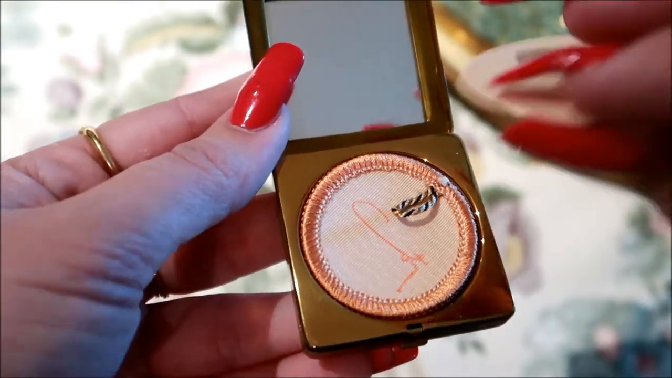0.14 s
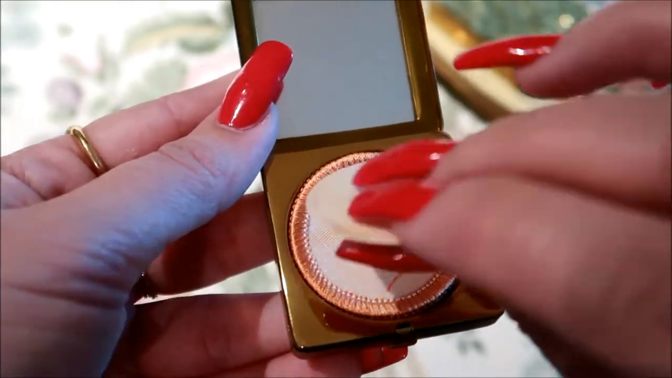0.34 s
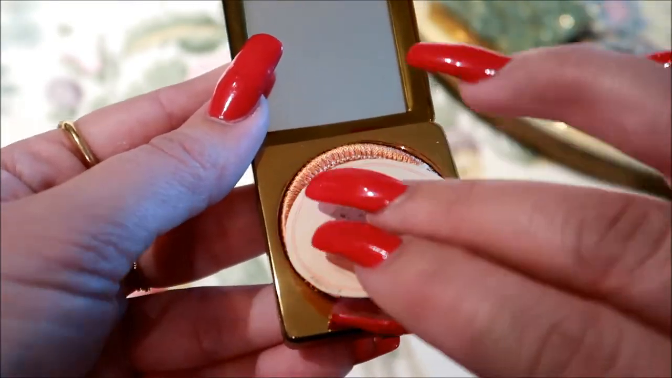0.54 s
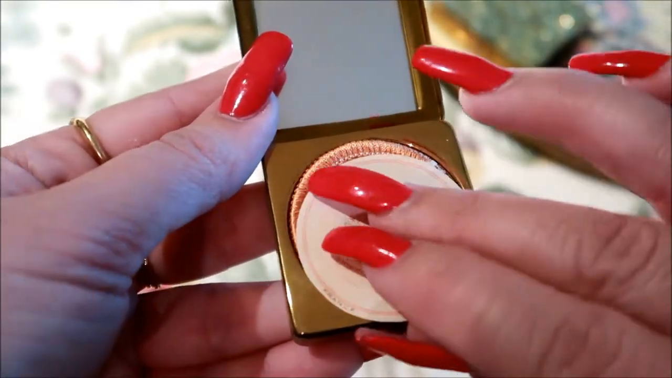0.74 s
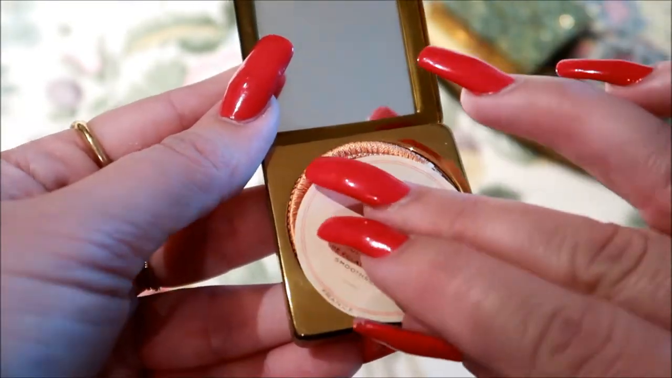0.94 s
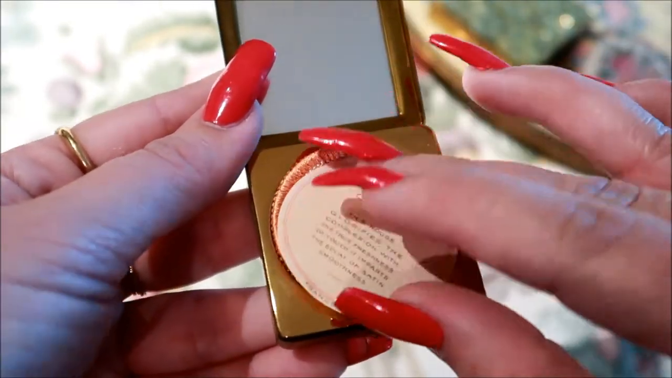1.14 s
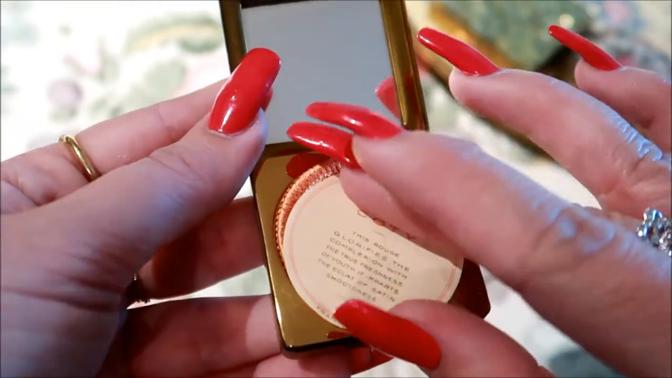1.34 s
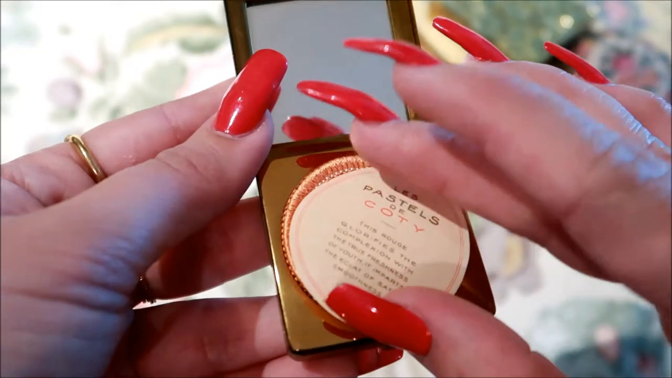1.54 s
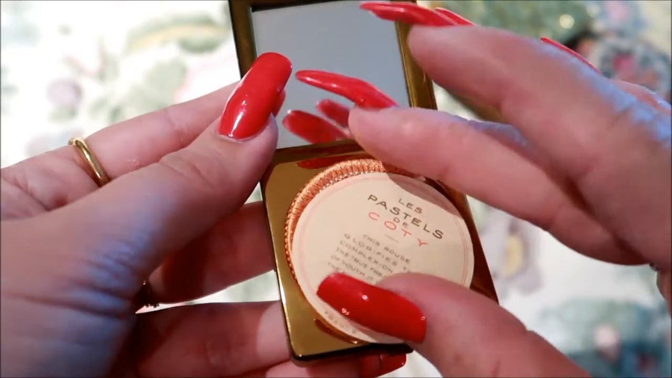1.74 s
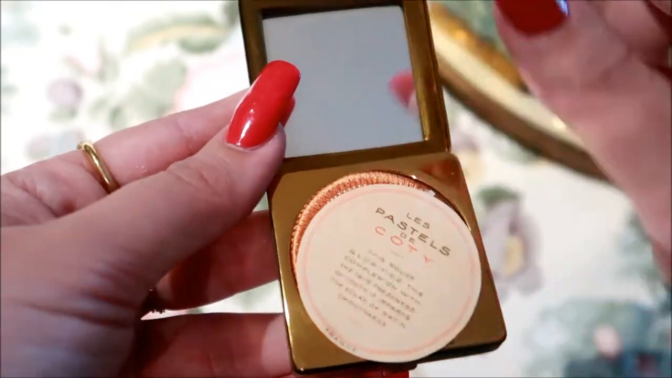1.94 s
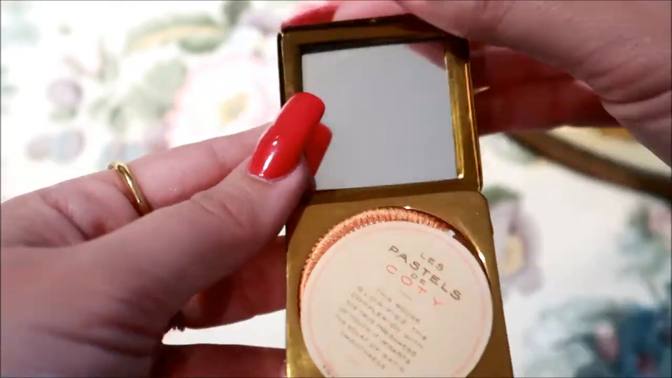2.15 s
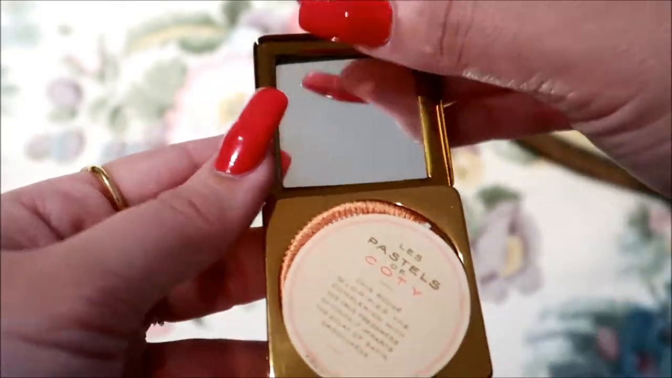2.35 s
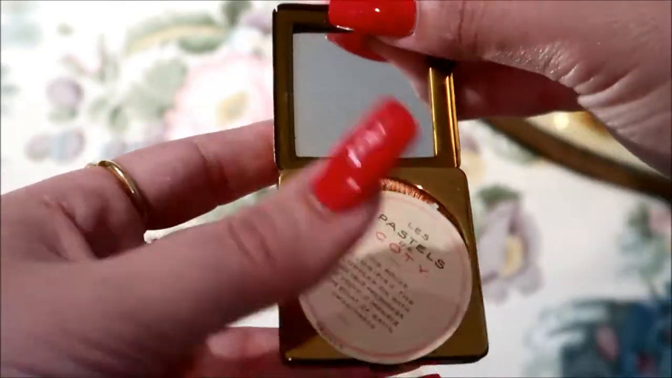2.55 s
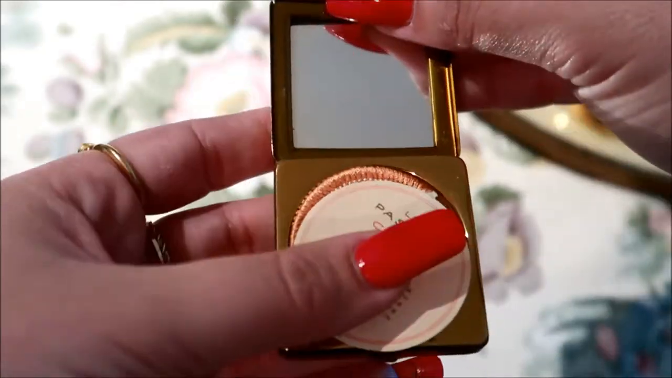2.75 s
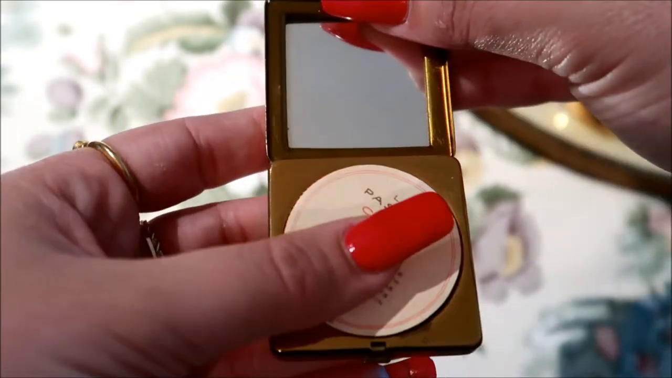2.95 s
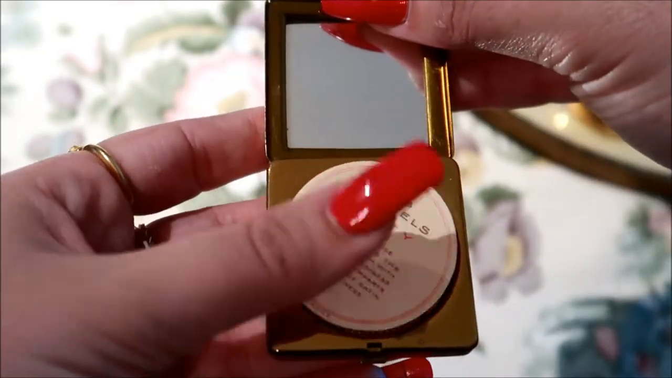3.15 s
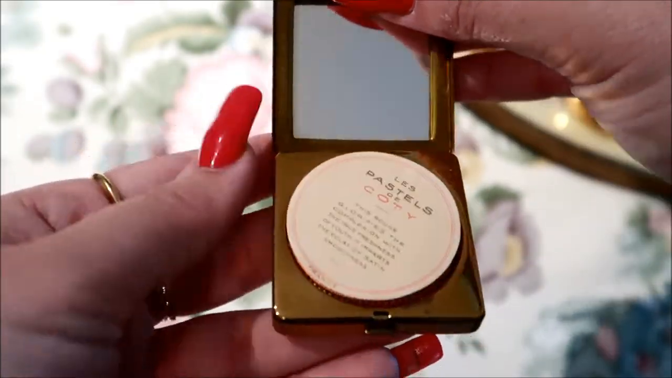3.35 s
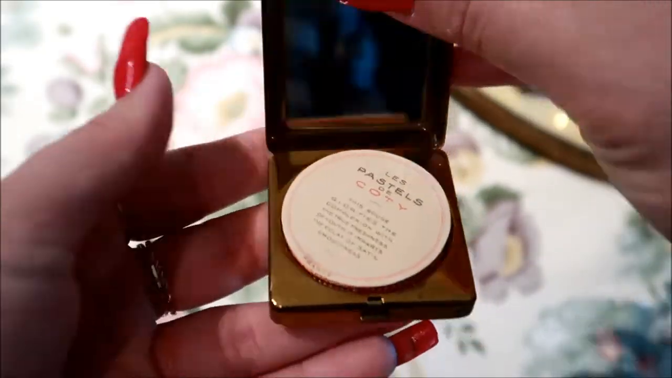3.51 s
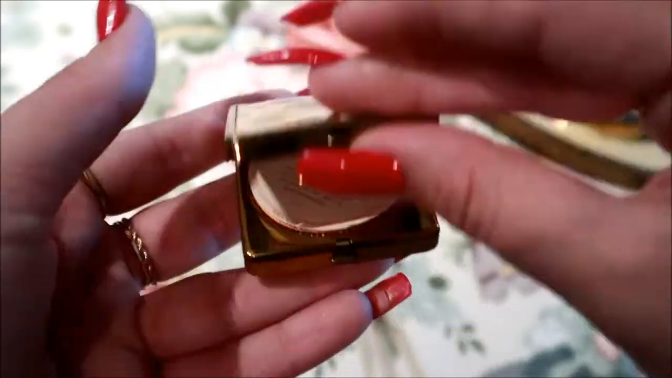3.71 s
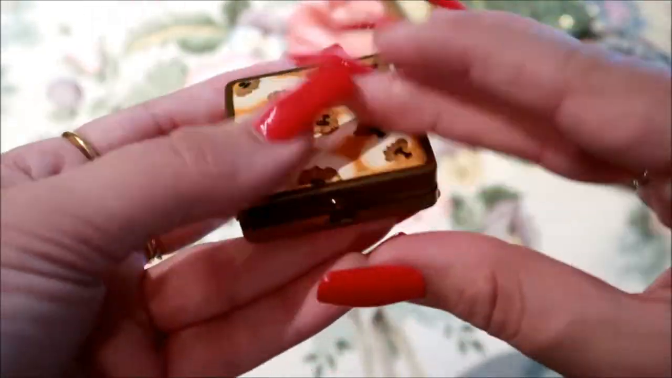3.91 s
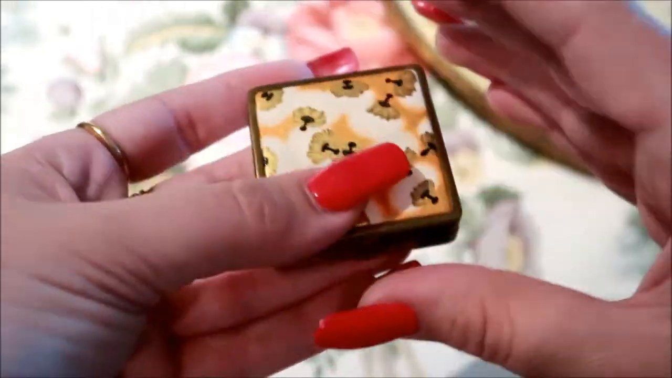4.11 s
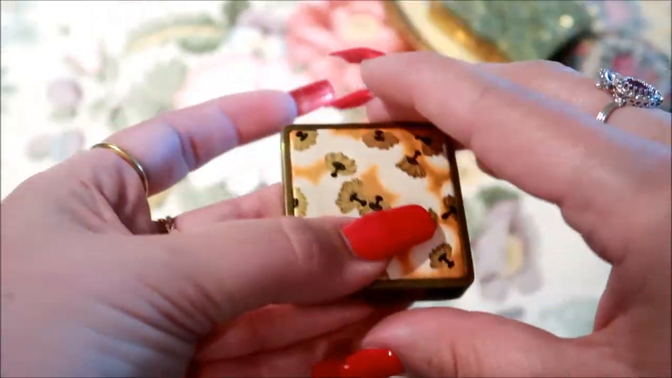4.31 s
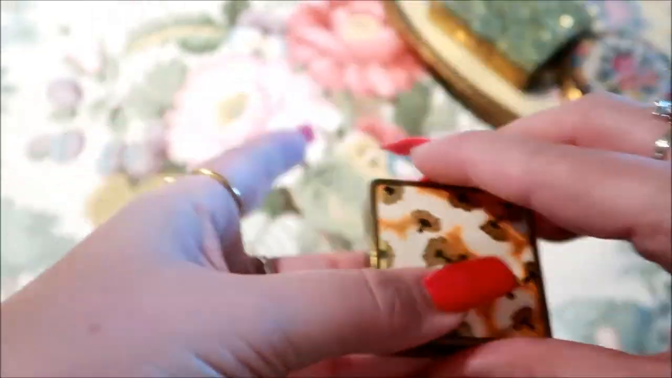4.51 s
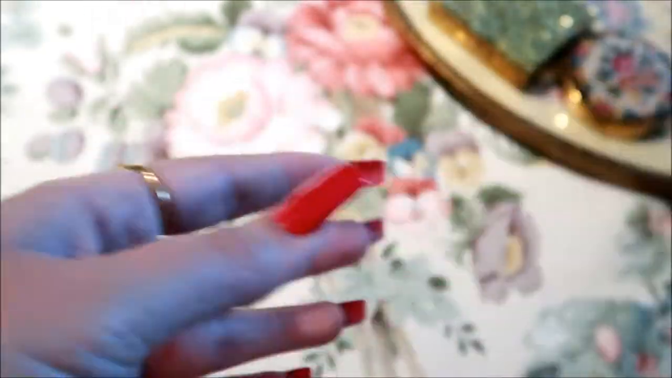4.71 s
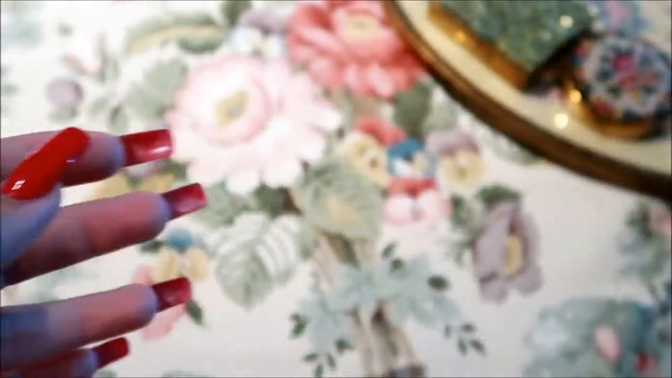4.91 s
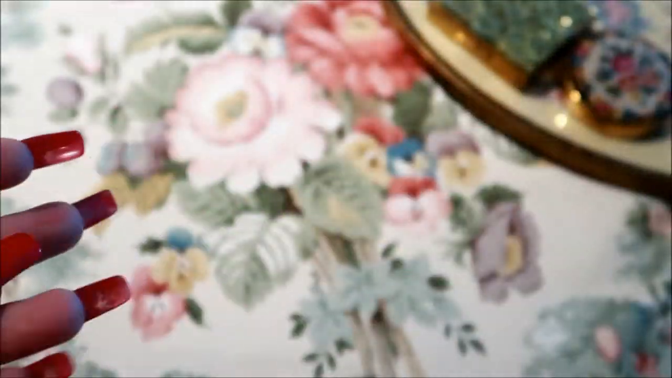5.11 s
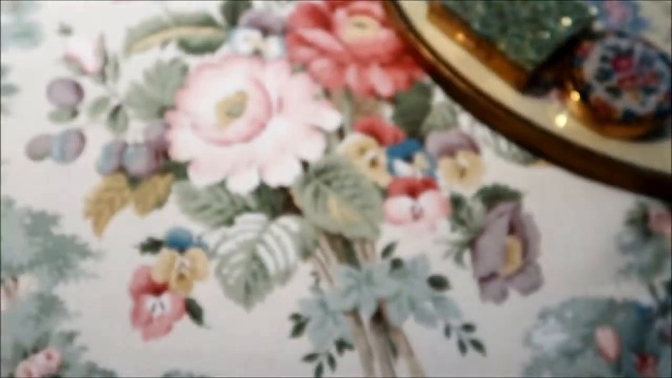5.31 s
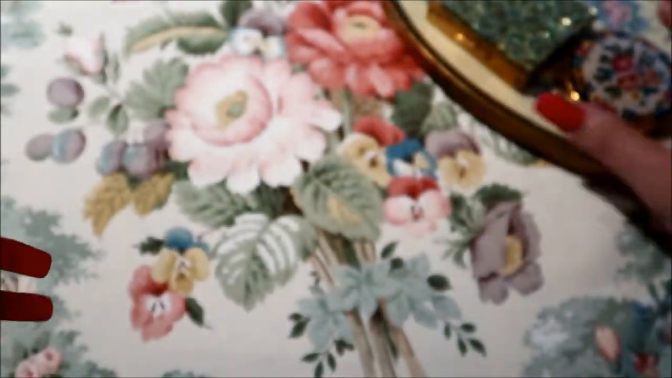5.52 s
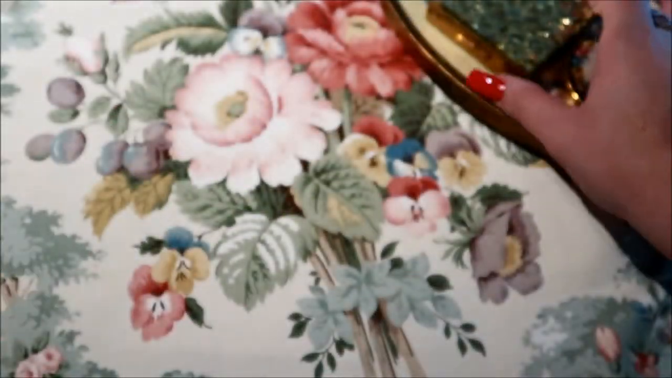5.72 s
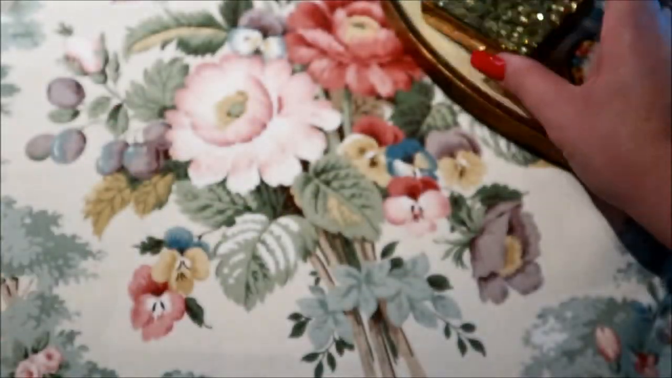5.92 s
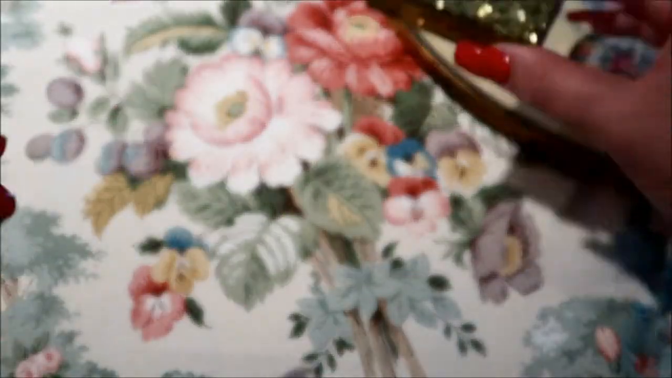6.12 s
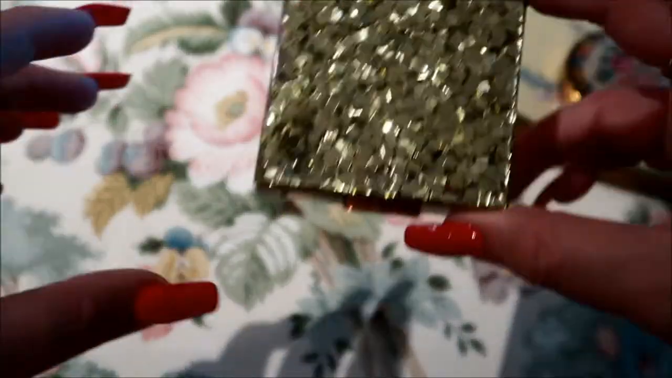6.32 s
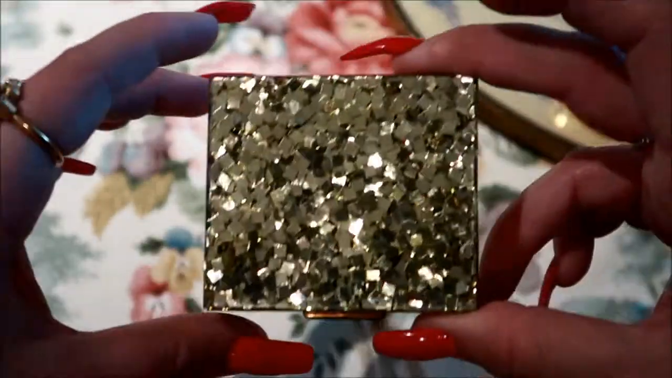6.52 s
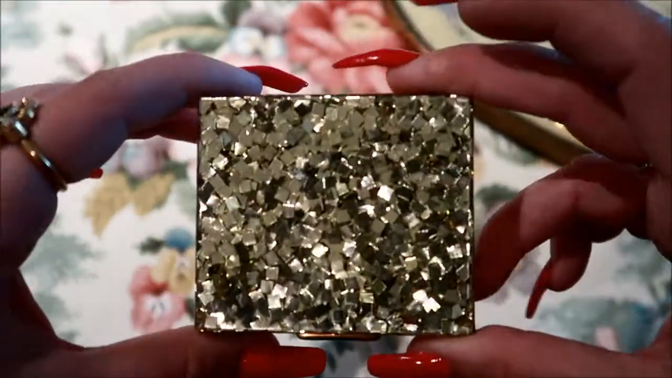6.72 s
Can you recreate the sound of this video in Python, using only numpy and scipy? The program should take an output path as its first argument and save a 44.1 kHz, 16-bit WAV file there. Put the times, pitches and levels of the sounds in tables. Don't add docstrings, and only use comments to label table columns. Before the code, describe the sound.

Long fingernails tap and tick on a small metal compact, its lid snaps shut, then it knocks onto a wooden table in a quiet room.

```python
import sys
import numpy as np
from scipy import signal
from scipy.fft import rfft, irfft
from scipy.io import wavfile
from scipy.ndimage import uniform_filter1d

SR = 44100
rng = np.random.default_rng(int(sys.argv[2]) if len(sys.argv) > 2 else 0)


def gain_from_db(level_db):
    decades = np.asarray(level_db, float) / 20
    return 10 ** decades


def transcribe(u):
    v = np.clip(np.atleast_2d(u).T, -1, 1)
    q = np.round(v * 32767).astype(np.int16)
    wavfile.write(sys.argv[1], SR, q)


N = 302526
EARLY = 0.05


def evened(x):
    return x / np.sqrt(np.mean(x ** 2) + 1e-20)


def read(points, hz):
    f, value = np.transpose(points)
    return np.interp(np.log(hz + 1), np.log(f + 1), value)


def coloured(x, points):
    gain = gain_from_db(read(points, np.fft.rfftfreq(len(x), 1 / SR)))
    return irfft(rfft(x) * gain, len(x))


def silence():
    return np.zeros(N + round(EARLY * SR))


def add(mix, s, sound):
    part = mix[max(round((s + EARLY) * SR), 0):][:len(sound)]
    part += sound[:len(part)]


def ring(t, hz, t60):
    return np.sin(2 * np.pi * hz * t) * gain_from_db(-60 * t / max(t60, 0.001))


def broad_crack(crack_hz):
    spread = 1.8
    t = np.arange(399) / SR
    crackle = 0.13 * rng.standard_normal(399) * np.exp(-t / 0.00083)
    edges = [crack_hz / spread, min(crack_hz * spread, 0.4 * SR)]
    crack = signal.lfilter(*signal.butter(1, edges, "band", fs=SR), np.append(1, crackle))
    return crack / abs(crack).max()


def blow(row, ring_t60, crack_hz, modes, body_db, reach, scuff_db, scuff_s, chatter_s):
    s, peak_db, hz, crack_db = row
    t = np.arange(9000) / SR
    sound = ring(t, hz, ring_t60 * (2000 / hz) ** 0.6)
    for f, db, decay in modes:
        chance = rng.standard_normal()
        near_db = -reach * abs(np.log2(f / hz))
        sound = sound + gain_from_db(body_db + db + near_db + chance) * ring(t, f * (1 + chance / 200), decay)
    sound = sound * (1 - np.exp(-t * hz / 0.33))
    sound[:400] += gain_from_db(crack_db + 0.5) * broad_crack(crack_hz)

    chatter = 0.04 * rng.standard_normal(400) * np.exp(-t[:400] / chatter_s)
    chatter[0] = 1
    sound = signal.oaconvolve(sound, chatter)

    lead = round(scuff_s * SR)
    rubbing = np.convolve(rng.standard_normal(400), ring(t[:200], hz, 3.2 / hz))
    scuff = gain_from_db(scuff_db) * evened(rubbing)[100:][:lead] * np.linspace(0.2, 1, lead)
    return s, gain_from_db(peak_db) * np.concatenate([scuff, sound / abs(sound).max()])


def blows(rows, **contact):
    out = silence()
    for row in rows:
        add(out, *blow(row, **contact))
    return out


# (t/s, peak level/dB, struck f/Hz, crack level/dB)
TAPS = [(0.286, -43, 2350, -2), (0.2885, -36, 1600, -11), (0.292, -40, 1050, -13), (0.3615, -21, 1715, 4),
        (0.374, -31, 1690, -20), (0.3765, -25.5, 1710, -10), (0.38, -31, 3100, -20),
        (0.602, -36.5, 2350, 3.5), (0.66, -28, 2120, -2), (0.8675, -43, 3760, -12),
        (0.8692, -11.5, 4600, -2), (0.8693, -16, 3760, -27), (0.8715, -30, 1980, -19),
        (1.365, -15, 2280, 19), (1.37, -23.5, 2200, 5), (3.954, -36.5, 1300, -20), (3.9575, -17, 1740, 1.5),
        (3.9725, -34, 3200, 7)]
# (f/Hz, level/dB, t60/s)
COMPACT = [(830, -0.5, 0.022), (1114, 0.5, 0.018), (1840, 2, 0.014), (2350, 7, 0.0078), (3030, 4, 0.01),
           (3508, -7, 0.03), (4030, -7, 0.0012), (5700, -22, 0.008), (6760, -18, 0.0066), (7980, -7, 0.008),
           (9700, -15.5, 0.015)]


def nail_taps():
    return blows(TAPS, ring_t60=0.0096, crack_hz=3500, modes=COMPACT, body_db=-9.5, reach=6.3,
                 scuff_db=-14.5, scuff_s=0.0024, chatter_s=0.00016)


# (t/s, peak level/dB, struck f/Hz, crack level/dB)
LID = [
    (4.2925, -42, 1910, -14.5),
    (4.2941, -1, 936, 1),
    (4.2942, -6.5, 1730, -29.5),
    (4.2948, -7, 3250, -36),
    (4.295, -13.5, 760, -35),
]


def lid_snap():
    return blows(LID, ring_t60=0.006, crack_hz=3100, modes=COMPACT, body_db=-14.5, reach=1.5,
                 scuff_db=-29, scuff_s=0.0022, chatter_s=0.000088)


# (t/s, peak level/dB, struck f/Hz, crack level/dB)
TICKS = [(0.204, -41, 2980, 28), (0.712, -41, 3160, -14), (0.73, -35, 4460, -4), (0.908, -44, 8500, 0),
         (1.007, -41, 3940, 7), (1.044, -41, 3700, -6), (1.343, -43, 3020, 11), (1.467, -46, 4880, -7),
         (1.502, -46, 3660, -13), (1.575, -33, 3820, 7), (1.623, -42, 4030, -14), (1.633, -49, 4000, -14),
         (1.661, -44, 4200, 0), (1.928, -43, 3770, 5), (2.284, -43, 4200, -13), (2.318, -33, 3250, 21),
         (2.391, -45, 4100, -10), (2.51, -49, 2610, 2), (2.563, -43, 3870, -12), (2.916, -38, 7500, 3),
         (2.9345, -39, 7500, 8), (2.9565, -42, 1800, -2), (2.964, -42, 1800, -12), (2.9845, -41, 3900, -2),
         (2.9935, -38, 4040, -6), (3.0, -44, 4200, -4), (4.06, -50, 9000, 2), (2.944, -29.5, 7400, -10),
         (4.021, -37, 3270, 1), (4.054, -28.5, 9400, 5), (4.062, -39, 4160, -7), (4.075, -45, 5500, 2.5),
         (4.566, -32.5, 5100, 1), (4.6665, -28.5, 7740, 5)]


def skin_ticks():
    return blows(TICKS, ring_t60=0.0066, crack_hz=12000, modes=COMPACT, body_db=-13, reach=9.3,
                 scuff_db=-16, scuff_s=0.0028, chatter_s=0.00049)


# (t/s, peak level/dB, struck f/Hz, crack level/dB)
PATS = [
    (0.363, -33.5, 500, 6),
    (0.376, -35, 590, -13),
    (0.661, -34.5, 716, -1.5),
    (1.367, -36.5, 434, -3),
    (1.584, -30.5, 3800, -21),
    (0.365, -37.5, 253, -23),
    (0.871, -38.5, 300, -20),
    (4.439, -37, 830, -25),
    (5.286, -24.5, 418, -12),
    (6.175, -34, 1210, -22.5),
]


def fingertip_pats():
    return blows(PATS, ring_t60=0.012, crack_hz=690, modes=COMPACT, body_db=-22, reach=3.3,
                 scuff_db=-15, scuff_s=0.000965, chatter_s=0.001)


# (t/s, length/s, level/dB, f/Hz, spread/octaves)
RUBS = [
    (0.727, 0.17, -60, 4970, 1),
    (1.245, 0.077, -61, 4460, 1.2),
    (1.738, 0.034, -54.5, 4630, 0.76),
    (1.946, 0.026, -61, 3840, 0.73),
    (2.422, .04, -71, 9000, 1.1),
    (2.865, 0.021, -63, 6000, 1.2),
    (2.936, 0.045, -49, 6840, 1.7),
    (2.979, 0.038, -51, 4740, 0.79),
    (4.645, 0.034, -53, 7440, .45),
]


def rubs():
    out = silence()
    for s, length, db, hz, spread in RUBS:
        size = round(length * SR)
        burst_db = 6.7 * np.minimum(rng.exponential(1, 8000), 4)
        grains = rng.standard_normal(8000) * gain_from_db(burst_db)
        near, far = 2 ** spread, 8 ** spread
        hump = [(hz / far, -30), (hz / near, -9), (hz, 0), (hz * near, -9), (hz * far, -30)]
        rub = evened(coloured(grains, hump))[:size]
        add(out, s, gain_from_db(db) * rub * signal.windows.tukey(size, 0.7))
    return out


# (t/s, level/dB)
RUSTLE = [
    (0.0, -65),
    (2.0, -67),
    (2.4, -78),
    (6.86, -80),
]


def rustle():
    grain_db = 2.3 * uniform_filter1d(rng.exponential(1, N), size=8)
    grains = rng.standard_normal(N) * gain_from_db(grain_db + 4 * slow(25))
    colour = [(700, -21), (2500, 6), (4500, 6), (9000, -12), (15000, -46)]  # (f/Hz, level/dB)
    level_db = np.interp(np.arange(N) / SR, *np.transpose(RUSTLE))
    out = silence()
    add(out, 0, evened(coloured(grains, colour)) * gain_from_db(level_db))
    return out


# (t/s, peak level/dB, struck f/Hz, crack level/dB)
KNOCKS = [
    (5.2595, -17.5, 907, -6.5),
    (5.2825, -11.5, 954, 1),
    (5.284, -14, 1300, -27),
    (5.2875, -17.5, 986, -12),
    (5.2935, -30, 1300, 3),
    (5.304, -35, 960, -4),
    (5.321, -31, 1300, 13),
    (5.986, -27.5, 1140, -1.5),
    (5.99, -34, 753, -16),
]
# (f/Hz, level/dB, t60/s)
TABLE = [(86.5, -8, 0.14), (201.8, -13, 0.3), (240, -6.5, 0.11), (300, -12.5, 0.085), (411, -4, 0.07),
         (683, 4, 0.017), (960, -10, 0.09), (1050, -3, 0.063), (1300, 0.5, 0.018), (1710, 0.5, 0.021)]


def table_knocks():
    return blows(KNOCKS, ring_t60=0.017, crack_hz=3800, modes=TABLE, body_db=-6, reach=1.36,
                 scuff_db=-16.5, scuff_s=0.000987, chatter_s=0.0046)


# (t/s, peak level/dB, struck f/Hz, crack level/dB)
CLACKS = [(-.035, -19.5, 2580, 1.5), (-.028, -22, 4770, -7), (-.02, -32, 3920, -2),
          (5.8532, -22.5, 3150, -15), (5.855, -24, 2330, 8), (5.858, -27.5, 3260, 2),
          (5.8853, -25, 3160, 5), (5.8872, -20, 3250, -17), (5.9, -32, 3250, -8), (5.9663, -22.5, 6550, 4),
          (5.968, -29, 1390, -10), (5.9715, -27.5, 1740, -10)]
# (f/Hz, level/dB, t60/s)
TRAY = [(1850, -20, 0.056), (2200, 3.5, 0.012), (2450, -21, 0.034), (2940, -0.5, 0.023), (2950, -3, 0.033),
        (3760, 8.5, 0.0092), (4370, 13, 0.0037), (5300, -5, 0.004)]


def tray_clacks():
    return blows(CLACKS, ring_t60=0.013, crack_hz=6700, modes=TRAY, body_db=-11, reach=2.1,
                 scuff_db=-18, scuff_s=0.000886, chatter_s=0.0022)


def radiated(x, low_hz, high_hz):
    low_cut = signal.butter(2, low_hz, "high", fs=SR, output="sos")
    high_cut = signal.butter(2, min(high_hz, 0.45 * SR), fs=SR, output="sos")
    return signal.sosfilt(high_cut, signal.sosfilt(low_cut, x))


def ports(x, pan_db, slant_db):
    side = gain_from_db(slant_db) * np.gradient(x)
    return np.array([gain_from_db(pan_db / 2) * x + side, gain_from_db(-pan_db / 2) * x - side])


# (f/Hz, t60/s)
ROOM = [(200, 0.28), (1000, 0.27), (4000, 0.29), (7000, 0.22), (12000, 0.29)]
# (f/Hz, level/dB)
ROOM_SIDE = [(200, -30), (700, -21), (2400, -14), (4400, -6), (8000, 0.5), (15000, 8)]
# (t/s, level/dB)
ECHOES = [
    (.0058, -22),
    (0.0135, -30),
    (.021, -31),
]


def room(x, tail_db=-12):
    at = np.arange(200, SR // 2, 20)
    shape = (2, len(at))
    taps = np.zeros((2, SR // 2 + 20))
    np.put_along_axis(taps, at + rng.integers(0, 20, shape), rng.choice([-1., 1.], shape), 1)
    hz, t, z = signal.stft(taps, SR, nperseg=256)
    decay = gain_from_db(-60 * t / read(ROOM, hz)[:, None])
    build = 1 - np.exp(-t / 0.004)
    mid, side = signal.istft(z * decay * build, SR, nperseg=256)[1]
    scale = gain_from_db(tail_db) / np.linalg.norm(mid)
    mid, side = scale * mid, scale * coloured(side, ROOM_SIDE)
    for s, db in ECHOES:
        mid[round(s * SR)] += gain_from_db(db)
    return signal.fftconvolve(x[None], np.array([mid + side, mid - side]), axes=1)[:, :len(x)]


def slow(hz):
    t = np.arange(N) / SR
    return evened(sum(np.sin(2 * np.pi * (f * t + rng.random())) for f in np.geomspace(0.1, hz, num=6)))


def wavering_line(hz, level_db, phase_turns, phase_hz):
    turns = hz * np.arange(N) / SR + phase_turns * slow(phase_hz)
    return gain_from_db(level_db) * np.sin(2 * np.pi * turns)


# (f/Hz, level/dB)
HUM = [
    (88, -70.5),
    (177.6, -59),
    (274.5, -65),
    (11450, -113),
]


def mains_hum():
    return sum(wavering_line(hz, db + 4 * slow(1.34), 0.11, 1.514) for hz, db in HUM)


# (t/s, low line level/dB, octave level/dB)
MOTOR = [(0.0, -61, -72), (0.69, -71, -71.5), (1.01, -63, -63.5), (1.47, -78, -63), (2.04, -59, -62.5),
         (2.43, -74, -60.5), (3.17, -75, -61.5), (3.78, -61, -58), (4.2, -64.5, -67), (4.49, -65, -62.5),
         (6.48, -61.5, -79), (6.86, -64, -64.5)]


def motor():
    s, low_db, high_db = np.transpose(MOTOR)
    out = np.zeros(N)
    for harmonic, db in ((1, low_db), (2, high_db)):
        load_db = np.interp(np.arange(N) / SR, s, db)
        out += wavering_line(harmonic * 59, load_db + 4.5 + 1.2 * slow(4), 0.17, 1.476)
    return out


# (f/Hz, level/dB per Hz)
FLOOR = [(8.8, -12), (15, -1), (48, -7.5), (86, -5.5), (119, -6.5), (146, -3.5), (179, -8), (277, -5),
         (303, -8), (350, -8.5), (575, -15.5), (1340, -18.5), (11600, -38.5), (14200, -46.5), (16000, -46)]
# (f/Hz, level/dB per Hz)
FLOOR_SIDE = [(8.8, -51), (15, -19), (50, -18), (262, 1), (575, -4.5), (865, -6.5), (3510, -14),
              (4180, -12), (4840, -17), (13800, -32.5), (16000, -50)]


def floor():
    mid = gain_from_db(-54.5 + 0.5 * slow(3)) * evened(coloured(rng.standard_normal(N), FLOOR))
    side = gain_from_db(-57) * evened(coloured(rng.standard_normal(N), FLOOR_SIDE))
    mid = mid + mains_hum() + motor()
    return np.array([mid + side, mid - side])


def scene():
    bright = nail_taps() + lid_snap() + skin_ticks() + rubs() + rustle()
    hands = radiated(fingertip_pats(), 140, 11000) + radiated(bright, 660, 10600)
    table = radiated(table_knocks(), 98, 10300)
    tray = radiated(tray_clacks(), 270, 10400)
    direct = ports(hands, -0.36, -10) + ports(table, -2.0, -0.41) + ports(tray, -1.9, -6)
    wet = room(hands + gain_from_db(7.5) * table + gain_from_db(7) * tray)
    return (direct + wet)[:, round(EARLY * SR):] + floor()


def roll_off(x):
    return signal.sosfilt(signal.butter(12, 16480, fs=SR, output="sos"), x)


def record(dry):
    edge = signal.firwin(255, 16000, window=("kaiser", 8), fs=SR)
    mix = signal.oaconvolve(dry, edge[None], "same")
    return roll_off(mix)


dry = scene()
out = record(dry)
transcribe(out)
```